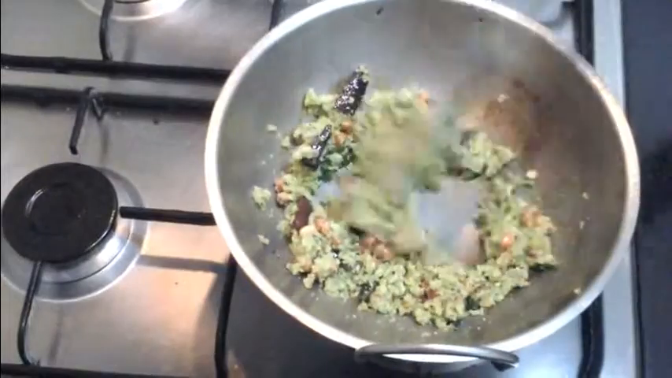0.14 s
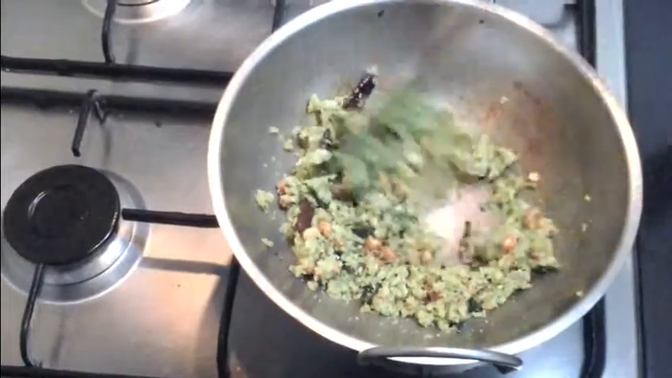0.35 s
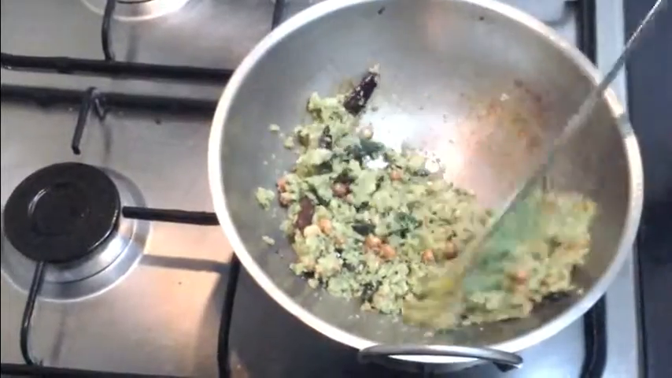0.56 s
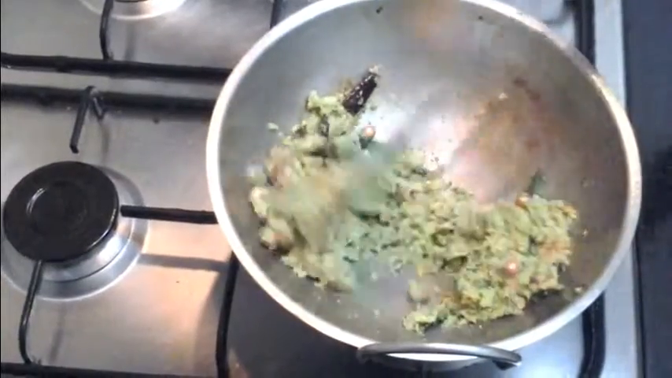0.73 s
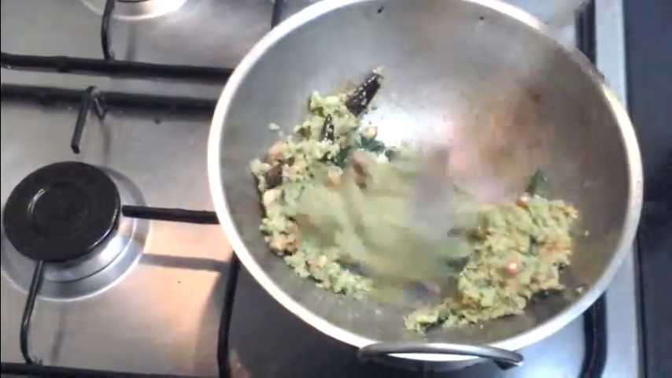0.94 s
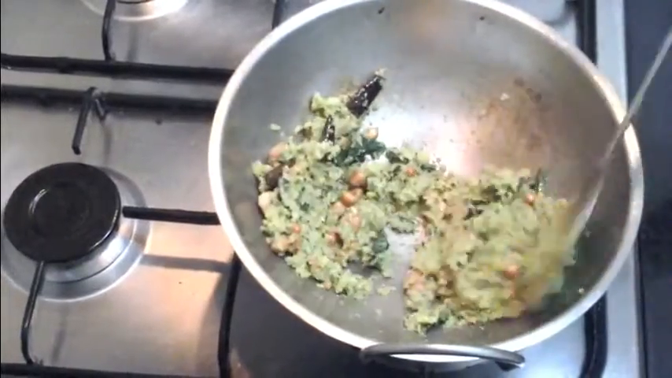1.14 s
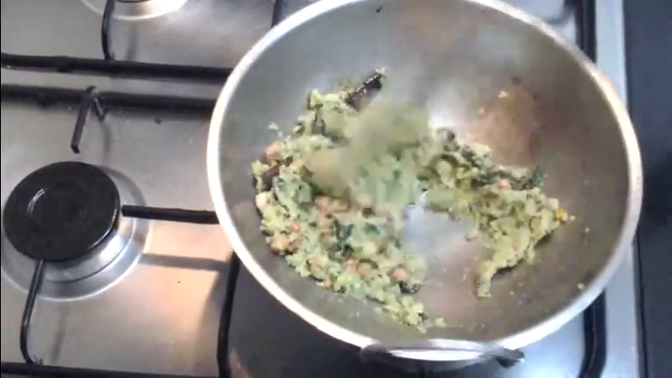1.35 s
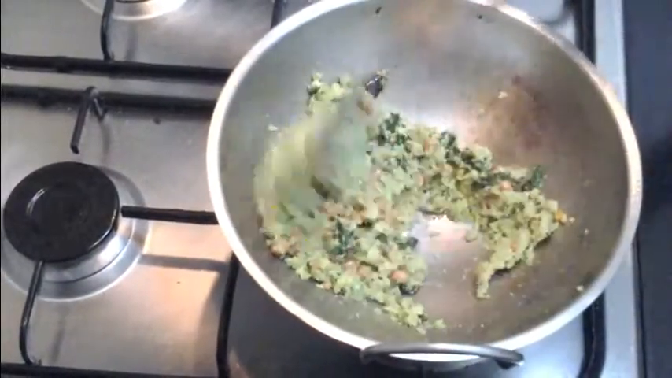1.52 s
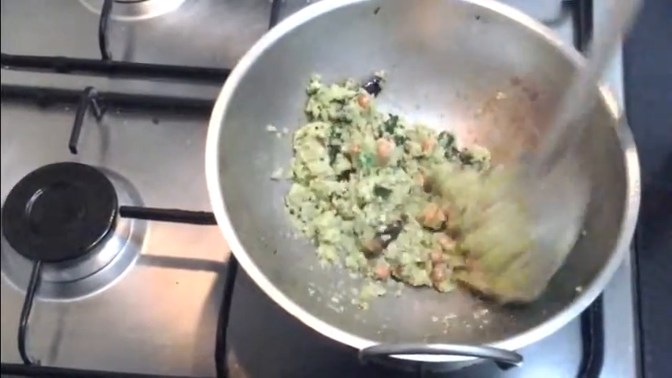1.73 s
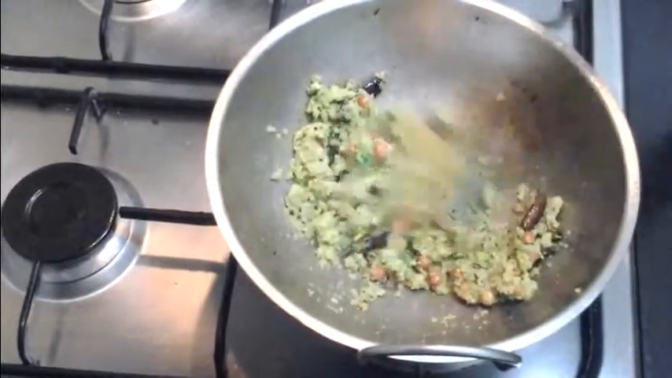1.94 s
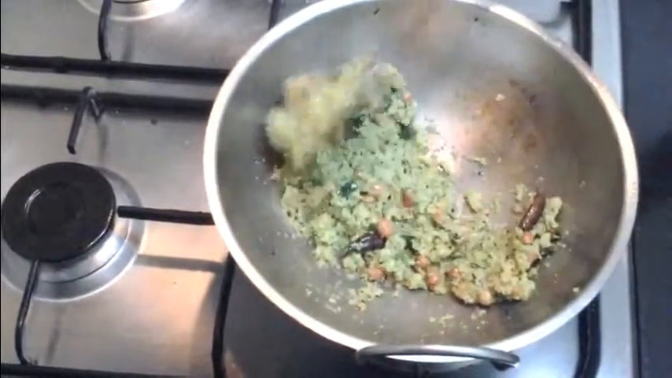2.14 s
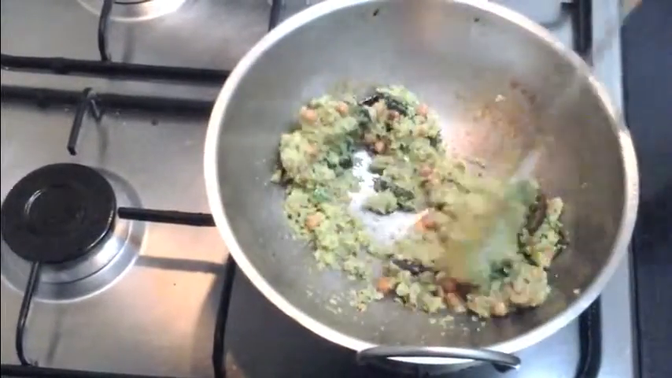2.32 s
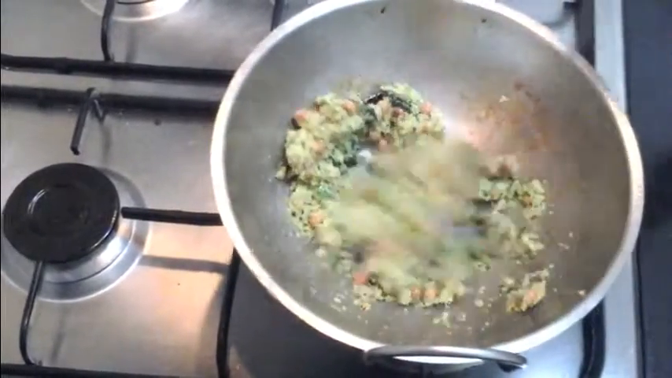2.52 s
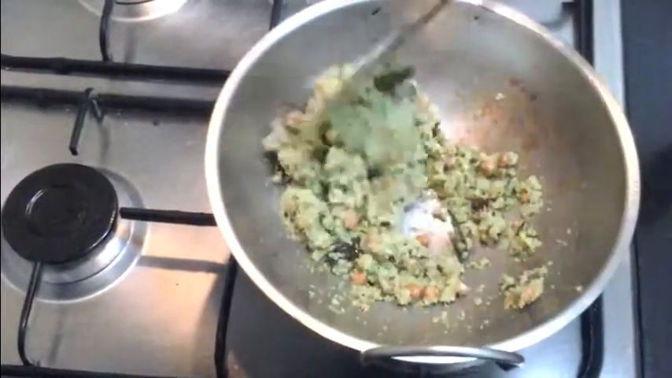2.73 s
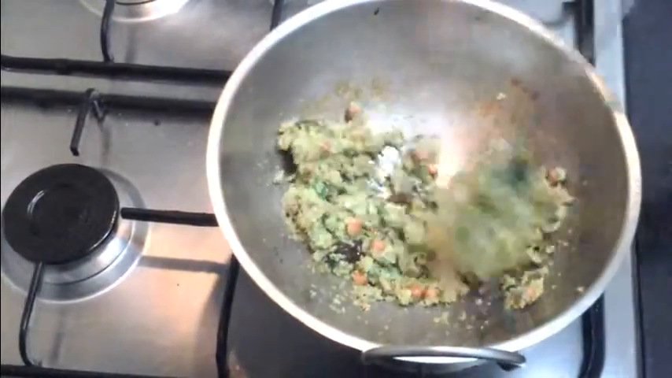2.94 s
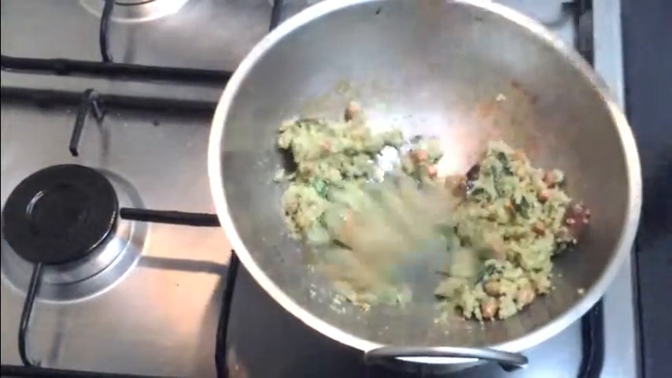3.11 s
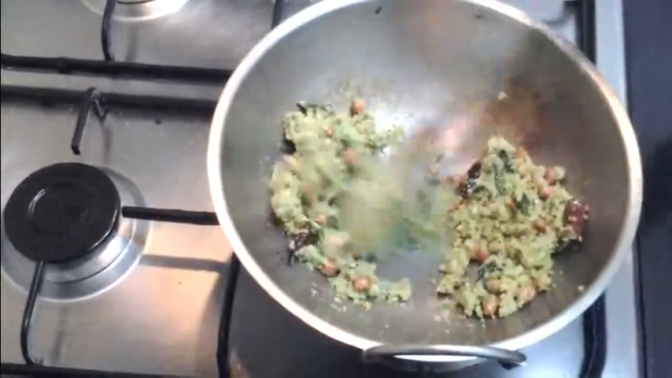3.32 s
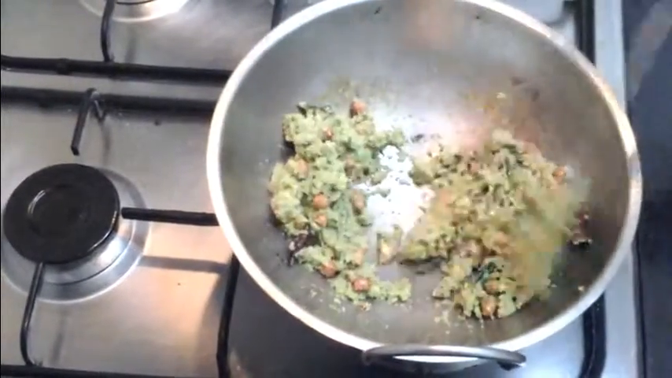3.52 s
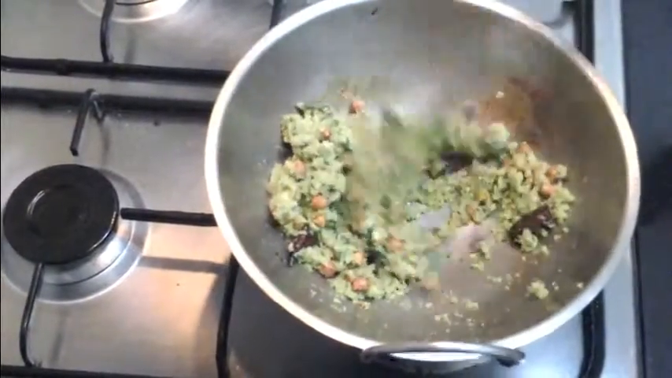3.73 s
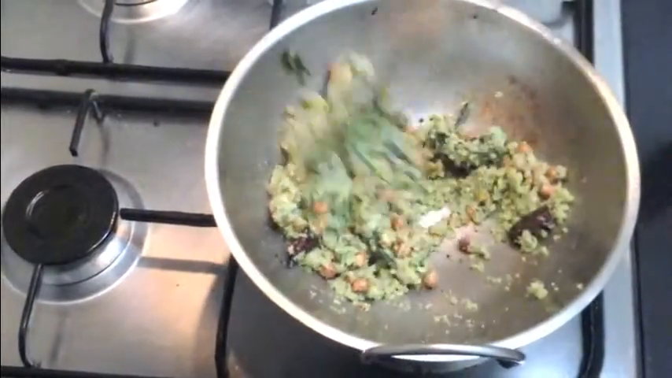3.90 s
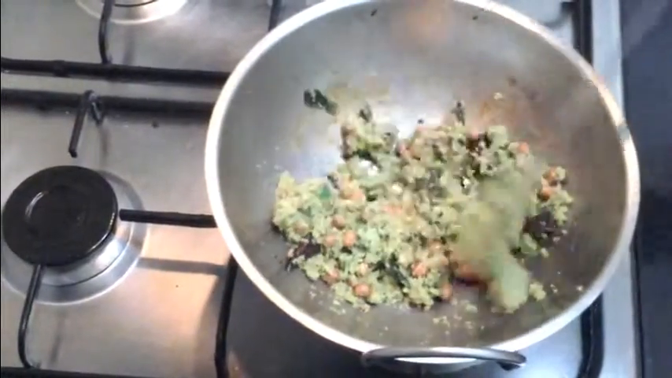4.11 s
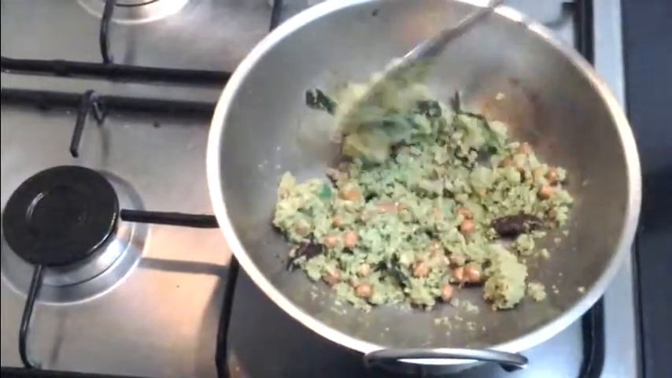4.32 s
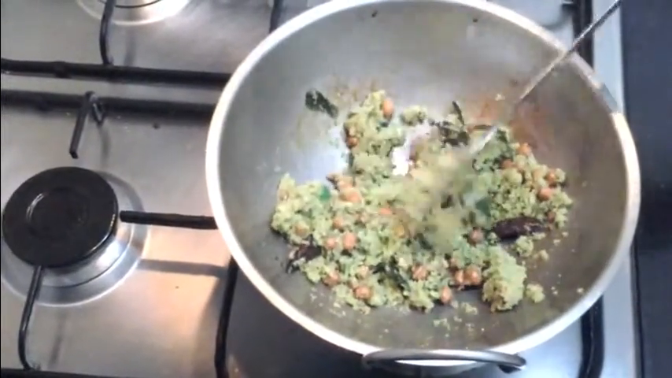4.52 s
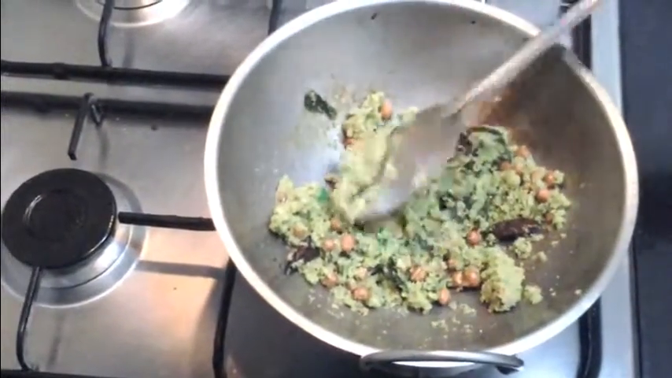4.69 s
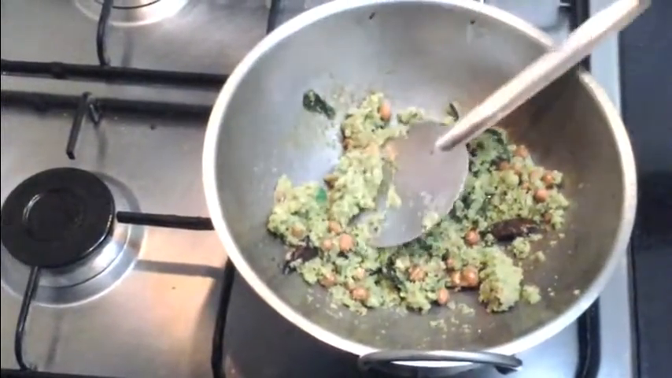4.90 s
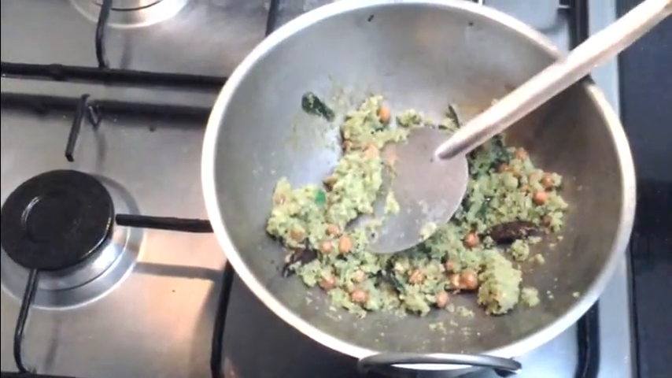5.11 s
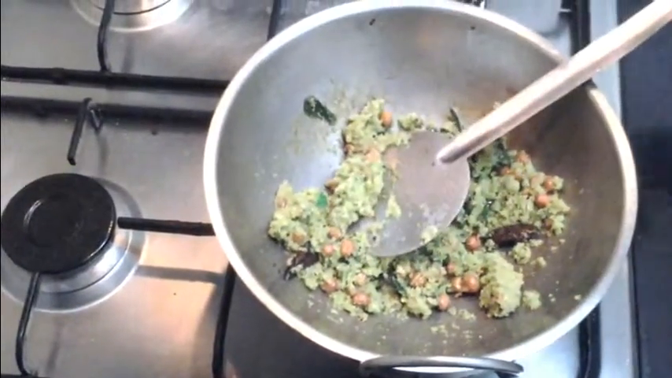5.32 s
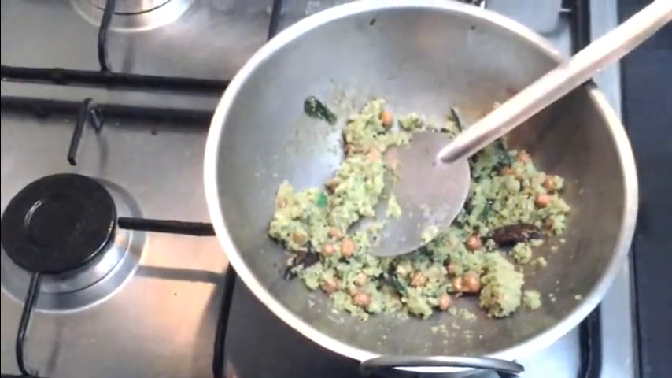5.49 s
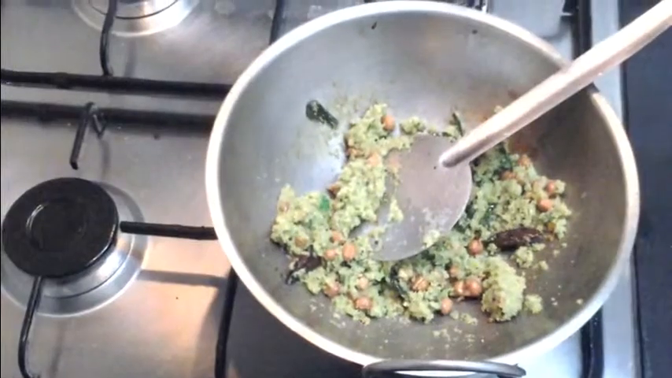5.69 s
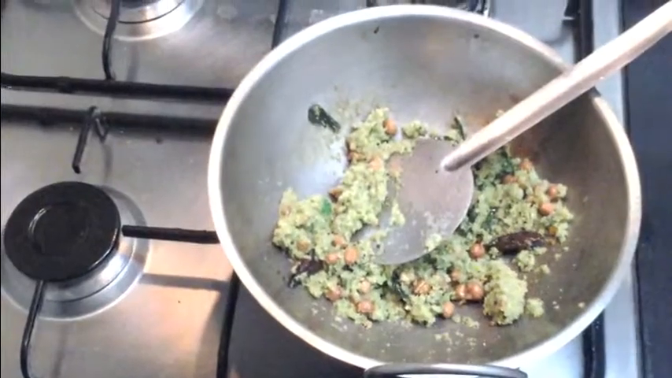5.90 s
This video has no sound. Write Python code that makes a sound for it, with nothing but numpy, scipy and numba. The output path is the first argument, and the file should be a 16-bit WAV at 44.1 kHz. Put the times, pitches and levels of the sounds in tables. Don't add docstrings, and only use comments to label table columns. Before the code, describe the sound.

Continuous crisp sizzling lies under quick, uneven spatula strokes: dull hits through paste, hollow pan rings, hard bright cracks, little squeaks and scraping chatter. The hob rumbles softly with the heavier strokes. The busiest hits come before four and a half seconds, then a few light ticks and quiet frying. Heard close in stereo, with a short hard kitchen reverberation.

```python
import sys
import numpy as np
from scipy import signal
from scipy.fft import rfft, irfft
from scipy.io import wavfile
from scipy.ndimage import uniform_filter1d
from numba import njit

SR = 44100
rng = np.random.default_rng(int(sys.argv[2]) if len(sys.argv) > 2 else 0)


def attenuation_scalar(level_db):
    decades = np.asarray(level_db, float) / 20
    return 10 ** decades


def int16_out(signal):
    q = np.round(np.clip(np.atleast_2d(signal).T, -1, 1) * 32767)
    wavfile.write(sys.argv[1], SR, q.astype(np.int16))


N = 262395

# start in seconds, hold in seconds,
# rumble in the bottom in dB, chatter in the wall in dB.
STROKES = [(-.05, 0.017, -54, -37), (0.133, 0.11, -43.5, -44), (0.259, 0.042, -29, -27.5),
           (0.406, 0.034, -39.5, -32), (1.258, .02, -35.5, -36), (1.43, 0.085, -27.5, -24.5),
           (1.618, 0.029, -33, -29), (2.029, 0.013, -49, -38.5), (2.531, 0.035, -29, -27.5),
           (2.63, 0.32, -34.5, -38.5), (3.248, 0.017, -29.5, -29), (3.455, .03, -56, -34.5),
           (3.722, 0.11, -34, -38), (3.824, 0.049, -30.5, -24), (4.032, 0.071, -38, -45),
           (4.215, 0.015, -40.5, -34.5), (4.392, 0.052, -29, -29), (4.576, 0.24, -44.5, -47),
           (4.835, 0.21, -41.5, -41), (5.112, 0.21, -43, -46), (5.746, 0.2, -66, -41.5)]
# frequency in Hz, level in dB.
KITCHEN = [(15, -52), (25, -7), (69, -25), (306, -1), (604, 1.5), (920, 1), (1370, 4), (1780, -18),
           (2270, 7.5), (3000, -19.5), (3900, -7), (6600, -120)]
# time in seconds, simmer in dB.
SIMMER = [(0, -33.5), (.5, -33.5), (.9, -30.5), (1.3, -33), (1.85, -31), (2.45, -35), (3.2, -35.5),
          (3.65, -28), (4.2, -33.5), (4.45, -32), (4.8, -33.5), (5.55, -37.5), (5.95, -35.5)]
# start in seconds, hold in seconds, fizz in dB, steam top in dB.
FLARES = [(.25, 0.12, -31, -56), (.42, 0.013, -27, -41), (.55, 0.073, -29.5, -42),
          (.64, 0.038, -28.5, -38.5), (.82, 0.15, -39, -62), (1.26, 0.0081, -30, -44.5),
          (1.42, 0.17, -29, -46), (1.62, 0.044, -29, -42), (1.91, 0.025, -36, -42.5),
          (2.06, 0.084, -24.5, -36), (2.16, 0.093, -26.5, -42.5), (2.54, 0.014, -24.5, -41),
          (2.67, 0.21, -28, -46.5), (3.0, 0.015, -36, -47), (3.25, 0.026, -31.5, -51),
          (3.5, 0.031, -29, -46.5), (3.72, 0.055, -34.5, -53), (3.95, 0.056, -31, -40.5),
          (4.26, 0.078, -32, -47)]
# start in seconds, hold in seconds, level in dB.
JETS = [
    (.56, .16, -39),
    (2.08, .2, -38),
    (3.49, .1, -33),
    (3.62, .06, -37),
    (.9, .2, -41),
]
# frequency in Hz, level in dB per Hz.
FIZZ = [(530, -5), (900, -21), (1100, -24), (1340, -10), (1780, -12.5), (2000, -7.5), (2790, -3.5),
        (3100, -2), (4110, 3), (6200, -15), (8630, -15.5), (13700, -28), (15000, -35)]

# frequency in Hz, level in dB, t60 in seconds,
# left minus right in dB, left lead in radians.
WALL = [(509.6, -15, 0.3, -0.5, 1.5), (545, -18.5, 0.028, 16, -2.5), (682, -17.5, 0.17, -12, 1.34),
        (705, -10.5, 0.12, -10, 0.9), (735.5, -17, 0.25, 6, 2), (725, -12, 0.15, -8.5, -1),
        (828, -12, 0.085, 1, 0), (859.4, -8.5, 0.21, 8.5, 2.6), (871, -15, 0.53, -4.5, 2),
        (1034, -21.5, 0.034, -34, -2.9)]
LONG_RING = [(797, 1.4, 0.27, 7.5, -0.32), (889.6, 0.59, 0.41, -3, 1)]
GRATE = [(916.7, -1.6, 0.16, -15.5, 0.54), (929, 1.7, 0.07, -13, -1.85)]
BOTTOM = [(277.8, -8, 0.17, -12, -0.99), (310.6, 2, 0.19, 5, -0.25), (333.5, -4, 0.055, -3, -0.75),
          (368.5, -9, 0.14, -12.5, 0.27), (378, -9.5, 0.074, 2, -1.2), (420, -10.5, 0.061, 2, 0.24)]
UPPER = [(1152, -12, 0.071, 23, -4.5), (1263, -3, 0.12, 4, 0.5), (1456, -5, 0.041, 17.5, 4),
         (1670, -13.5, 0.11, -20, 8), (1844, -5.5, 0.05, 1, -2), (1964, -11, 0.17, 12, 1.5),
         (1940, -30, 0.039, -11, 2), (2272, -3.5, 0.085, -7, 0.5), (2580, -25, 0.035, -16, 12),
         (824, 3, 0.004, -4, 2.2), (1396, 5, 0.022, 12, 2.8), (2930, 2, 0.0065, 15, 2)]
CHATTER_DB = -1, -9, -12, -4.5, -20.5
# slips per second, size spread in dB.
CHATTER_GRAIN = (450, 3.0), (1500, 1.2)
CONTACT_MS = 1.8, 0.48, 0.68, 12, 0.52

# time in seconds, peak in dB, upper clank in relative dB,
# grip as a damping factor, lean in dB per octave.
GRATE_KNOCKS = [(0.263, -14.5, -19, 0.34, 9), (1.426, -9, -20, 0.72, 10), (1.466, -29.5, 3, 1.3, 1),
                (2.68, -11, -18, 1, 9), (2.819, -20, -13, 1.3, 7), (3.071, -32.5, -13, 1.6, -5),
                (3.253, -17.5, -18, 0.76, -1), (3.319, -24, -12, 1.5, 7), (3.4591, -12, -5, 3.4, 3),
                (3.819, -16.5, -12.5, 0.6, 16), (3.886, -8, -8, 2.2, 3), (4.41, -14.5, -20, 0.47, 5),
                (4.777, -30, -14, 0.72, -3)]
# time in seconds, peak in dB,
# upper clank in relative dB, grip as a damping factor, lean in dB per octave.
RIM_KNOCKS = [(1.287, -18.5, -12.5, 0.67, -4), (1.617, -7.5, -19.5, 0.81, 2),
              (2.555, -13.5, -13, 0.58, -13), (2.626, -19.5, -10.5, 1.1, -3), (3.349, -15.5, -29, 0.94, 7),
              (3.953, -13, -26, 2.6, 9), (3.982, -32, -23, 1, 3), (4.104, -13, -25, 1.4, 2),
              (4.145, -14.5, -28, 2.8, -5), (4.446, -11, -11.5, 2.6, 13), (4.52, -19.5, -24, 0.87, 21)]
# time in seconds, peak in dB, # upper clank in relative dB, grip as
# a damping factor, lean in dB per octave.
BLADE_KNOCKS = [(0.152, -14.5, -12.5, 1.8, -17), (0.291, -20, -14, 2.1, -3), (0.301, -15, -14, 1, -4),
                (0.387, -28, -8, 2.1, -3), (0.431, -7.5, -15, 1.34, -10), (1.499, -5.5, -11.5, 1.07, 11),
                (2.018, -24.5, -28, 1.4, 2), (2.7135, -5, -17.5, 2.1, 6), (2.738, -30, -17, 1.4, 2),
                (2.759, -14, -15, 1.35, -3), (2.849, -15.5, -10, 1.6, 7), (2.955, -24, -28, 0.62, 0),
                (3.29, -18, -7, 2.1, -6), (3.745, -23, -7, 0.95, -15), (3.853, -17, -13, 2.1, -3),
                (3.935, -20, -5, 3.2, -3), (4.054, -13.5, -15.5, 1.8, 13), (4.614, -21.5, -24, 0.81, -4),
                (4.721, -26, -19, 1.1, 7)]
# long wall ring and grate ring, in dB relative to the peak.
KNOCK_RINGS = [(-20.5, -4.5), (-17, -27), (-19.5, -10.5)]

# time in seconds, peak in dB, centre in Hz, top in dB.
TICKS = [(0.153, -18, 3750, -8), (0.2617, -13.5, 3580, -12), (0.4325, -4, 2220, -24),
         (0.805, -18, 3970, -20), (1.424, -11.5, 2670, -7.5), (1.4666, -13, 3180, -11),
         (1.724, -12, 3900, -16), (2.5555, -7, 1850, -35), (2.559, -5.5, 3260, -37),
         (2.618, -32, 4000, -25), (2.6775, -9.5, 3930, -11), (2.7117, -17, 3160, -8.5),
         (2.998, -16, 4340, -12), (3.071, -23, 4170, -18), (3.1383, -18.5, 3970, -30),
         (3.252, -18, 5000, -16), (3.2887, -15, 4470, -24), (3.8177, -18, 3130, -7),
         (3.8516, -17, 3220, -10), (3.959, -19.5, 4000, 0.5), (4.054, -21, 5000, -15),
         (4.409, -10, 3380, -16.5), (4.802, -23, 4100, -21), (4.9304, -19, 3700, -11)]
# time in seconds, peak in dB, centre in Hz, top in dB.
SKIDS = [
    (0.301, -12.5, 3380, -16),
    (1.4985, -4, 4600, -13.5),
    (1.514, -9.5, 2280, -25),
    (2.859, -12.5, 3500, -13.5),
    (3.883, -7.5, 4500, -13),
    (4.254, -10, 3770, -19),
    (4.4437, -12.5, 4400, -15),
]
# time in seconds, peak in dB, centre in Hz, top in dB.
CRACKS = [
    (1.6165, 3, 3030, -11),
    (1.621, -2.5, 2960, -10),
    (3.4595, 1.5, 983, -27),
    (3.4597, -3, 2930, -14),
]
# time in seconds, peak in dB, centre in Hz, top in dB.
SQUEAKS = [
    (1.777, -13.5, 4200, -19),
    (3.026, -12.5, 4660, -25),
    (4.2625, -3.5, 3800, -29),
    (4.272, -23, 3980, -26),
    (4.298, -16, 3540, -28),
    (4.33, -21, 3900, -28),
    (4.347, -14.5, 3740, -22),
    (4.368, -19, 3980, -28),
    (5.7248, -27, 2310, -25),
]
# frequency in Hz, left minus right in dB.
PORTS = [(60, -1.0), (110, -1.5), (200, -1.0), (380, -1.0), (700, -2.0), (1290, -1.0), (2380, 1), (4400, 4),
         (8120, 0), (15000, -14.5)]


def level(x, db):
    return x * attenuation_scalar(db) / np.sqrt(np.mean(x ** 2))


def curves(table):
    s, *columns = np.transpose(table)
    return [np.interp(np.arange(N) / SR, s, c) for c in columns]


def colour(x, points):
    hz, db = np.transpose(points)
    grid = np.fft.rfftfreq(2048, 1 / SR) + 1
    cepstrum = irfft(np.interp(np.log(grid), np.log(hz), db) * np.log(10) / 20)
    cepstrum[1:1024] *= 2
    cepstrum[1025:] = 0
    return signal.fftconvolve(x, irfft(np.exp(rfft(cepstrum))))[:N]


def band(x, lo_hz, hi_hz, order=2):
    return signal.sosfilt(signal.butter(order, [lo_hz, hi_hz], "band", fs=SR, output="sos"), x)


def walk(rate):
    k = int(SR / rate)
    held = rng.standard_normal(size=4096)[np.arange(N) // k]
    return 1.84 * uniform_filter1d(uniform_filter1d(held, k), k)


def grains(rate, spread_db):
    when, size, sign = rng.random((3, N))
    hit, out = when < rate / SR, np.zeros(N)
    out[hit] = attenuation_scalar(-spread_db * np.log(size[hit] + 2e-3)) * np.sign(sign[hit] - .5)
    return level(out, 0)


def power_sum(*dbs):
    return 10 * np.log10(sum(attenuation_scalar(db) ** 2 for db in dbs))


def swells(table, attack_s, fade_db_s):
    t = np.arange(0, N / SR, 1e-3)
    start, hold, *levels = np.transpose(table)[:, :, None]
    rise = np.clip((t - start) / attack_s, 0, 1) ** 2
    shape = rise * attenuation_scalar(-fade_db_s * np.maximum(t - start - attack_s - hold, 0))
    power = [np.sum(shape ** 2 * attenuation_scalar(db) ** 2, axis=0) + 1e-12 for db in levels]
    return [np.interp(np.arange(N) / SR, t, 10 * np.log10(p)) for p in power]


def drag():
    rumble_db, chatter_db = swells(STROKES, attack_s=0.035, fade_db_s=87)
    return power_sum(rumble_db, -52.5), power_sum(chatter_db, -48.5)


def shake():
    return -51.5 + 0.79 * (drag()[0] + 30)


def hob():
    noise = rng.standard_normal((6, N))
    draught = level(band(.5 * noise[0] + 1.6 * noise[1:3], 19, 90), -4.0) * attenuation_scalar(2.5 * walk(6.5))
    sheet = level(band(noise[0] + 0.83 * noise[1:3], 80, 200), 0.95) * attenuation_scalar(2 * walk(12))
    flame = band(noise[5], 122, 520)
    hum = np.array([level(flame + colour(n, KITCHEN) * 4.4, -42.5) for n in noise[3:5]])
    return (draught + sheet) * attenuation_scalar(shake()) + band(hum, 120, 13000, order=3)


def heat():
    simmer_db, = curves(SIMMER)
    flare_db, flare_steam_db = swells(FLARES, attack_s=0.014, fade_db_s=162)
    simmer_steam_db = simmer_db - 15.5
    fizz_db = power_sum(simmer_db, flare_db)
    steam_db = power_sum(simmer_steam_db, flare_steam_db)
    wet_db = power_sum(simmer_db - 10.5, flare_db - 8, drag()[1] - 4.5)
    return fizz_db, steam_db, wet_db, power_sum(0, flare_steam_db - simmer_steam_db)


def frying():
    fizz_db, steam_db, wet_db, _ = heat()
    shared, flicker = grains(6000, 1.8), walk(22.07)
    jets_db, = swells(JETS, attack_s=0.015, fade_db_s=150)
    out = []
    for _ in range(2):
        pops = colour(0.28 * shared + 0.96 * grains(6000, 2.4), FIZZ)
        fizz = level(band(pops, 2230, 6520, order=3), 1.57)
        fizz = fizz * attenuation_scalar(fizz_db + .5 * flicker + 0.87 * walk(60))
        steam = level(band(pops, 7520, 19300, order=3), 3.3)
        steam = steam * attenuation_scalar(steam_db + .25 * flicker + 0.5 * walk(35))
        wet = level(band(pops, 890, 1937, order=3), -0.95) * attenuation_scalar(wet_db + .7 * walk(24.98))
        jet = level(band(pops, 4150, 5200), 0) * attenuation_scalar(jets_db + 2.3 * flicker)
        out.append(fizz + steam + wet + jet)
    return np.array(out)


@njit
def ring(force, poles):
    out, z = np.empty(len(force)), 0j
    for i in range(len(force)):
        z = z * poles[i] + force[i]
        out[i] = z.imag
    return out


def pan():
    kinds = zip([GRATE_KNOCKS, RIM_KNOCKS, BLADE_KNOCKS], KNOCK_RINGS)
    blows = np.array(sorted(row + rings for rows, rings in kinds for row in rows))
    at = (blows[:, 0] * SR).astype(int)
    peak_db, upper_db, grip, lean_db, long_db, grate_db = blows[:, 1:].T
    family_db = peak_db + np.array([-4 + 0 * at, long_db, grate_db, -24 + 0 * at, upper_db])
    latest = np.searchsorted(at, np.arange(N), "right") - 1
    damping = grip[np.maximum(latest, 0)]
    bottom_db, wall_db = drag()
    out = np.zeros((2, N))
    for k, family in enumerate([WALL, LONG_RING, GRATE, BOTTOM, UPPER]):
        is_bottom = family is BOTTOM
        drag_db = (bottom_db if is_bottom else wall_db) + CHATTER_DB[k]
        wander_db = (2.6 if is_bottom else 1.3) * walk(30)
        slip = grains(*CHATTER_GRAIN[is_bottom]) * attenuation_scalar(drag_db + wander_db)
        samples = np.arange(400)
        push = np.exp(-samples / (SR * CONTACT_MS[k] / 1000))
        for hz, db, t60, pan_db, lead in family:
            loss = np.log(1000) / (max(t60, .01) * SR) * damping
            poles = np.exp(2j * np.pi * hz * (1 + 0.0015 * walk(10)) / SR - loss)
            place = rng.standard_normal((3, len(at)))
            lean = lean_db * np.log2(np.clip(hz, 690, 960) / 833) * (600 < hz and k < 3)
            onset = push * np.exp(2j * np.pi * hz / SR * samples) / push.sum()
            for ch, side in enumerate((.5, -.5)):
                force = slip * np.sqrt(2 * loss) + 0j
                blow = attenuation_scalar(family_db[k] + lean + 2.8 * place[0]) * np.exp(.45j * place[1 + ch])
                np.add.at(force, at[:, None] + samples, blow[:, None] * onset)
                out[ch] += ring(force * attenuation_scalar(db + side * pan_db) * np.exp(1j * side * lead), poles)
    return band(out, 263, 6800, order=4)


def ticks():
    t = np.arange(SR // 4) / SR
    out = np.zeros((2, N + len(t)))
    kinds = (TICKS, 0.035, 1), (SKIDS, 0.065, 1), (CRACKS, 0.01, 1), (SQUEAKS, 0.05, 0.42)
    rows = [row + (fade, width) for table, fade, width in kinds for row in table]
    for s, db, hz, top_db, fade, width in rows:
        noise = rng.standard_normal((3, len(t))) * attenuation_scalar(5.4 * rng.standard_normal(len(t)))
        noise = 0.42 * noise[0] + 1.15 * noise[1:]
        burst = 0.19 * attenuation_scalar(-60 * t / (0.21 * fade))
        scrape = 0.4 * attenuation_scalar(-60 * t / (2.6 * fade))
        body = level(band(noise, hz / 1.227 ** width, hz * 1.355 ** width, order=3), -4.5) * (burst + scrape)
        air = attenuation_scalar(-16) * band(noise, 11000, 11200)
        top = level(band(noise, 5160, 7260) + air, top_db) * attenuation_scalar(-60 * t / (0.8 * fade))
        click = band(1. * (t == t[12]), hz / 1.23 ** width, hz * 1.1 ** width)
        body += click / np.abs(click).max() * attenuation_scalar(-5)
        i = int(s * SR)
        out[:, i:i + len(t)] += (body + top) * np.minimum(t / 0.00036, 1) * attenuation_scalar(db)
    return out[:, :N]


def room(x, t60, wet_db):
    t = np.arange(int(.7 * SR)) / SR
    noise = rng.standard_normal((3, len(t))) * (t > .003)
    body = band(noise[0] + 0.59 * noise[1:], 67, 433) * 0.45 + band(noise[1:], 482, 2100)
    treble = .5 * band(noise[1:], 3400, 11800)
    tail = body * attenuation_scalar(-60 * t / t60) + treble * attenuation_scalar(-60 * t / (0.76 * t60))
    tail *= attenuation_scalar(wet_db) / np.sqrt(np.sum(tail ** 2) / 2)
    return x + signal.fftconvolve(x, tail, axes=1)[:, :N]


def scene():
    return room(pan() + ticks(), t60=0.36, wet_db=-11) + frying() + hob()


def bass_duck():
    idle = np.clip((-39 - drag()[0]) / 5, 0, 1)
    return -0.74 * (heat()[3] + 0.32) * idle * attenuation_scalar(0.92 * walk(21))


def band_limit(x):
    return signal.sosfilt(signal.butter(12, 15150, fs=SR, output="sos"), x)


def record(dry):
    bass = signal.sosfiltfilt(signal.butter(3, 210, fs=SR, output="sos"), dry)
    dry = dry + bass * (attenuation_scalar(bass_duck()) - 1)
    hz, db = np.transpose(PORTS)
    treble = db * (hz > 1500)
    left = colour(dry[0], np.c_[hz, treble / 2])
    right = colour(dry[1], np.c_[hz, -treble / 2])
    ports = np.array([left, right])
    limited = ports / (1 + (ports / 0.95) ** 6) ** (1 / 6)
    top_cut = signal.ellip(8, .2, 60, 14900, fs=SR, output="sos")
    return band_limit(signal.sosfilt(top_cut, limited))


dry = scene()
out = record(dry)
int16_out(out)
```